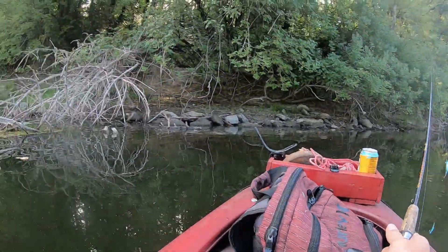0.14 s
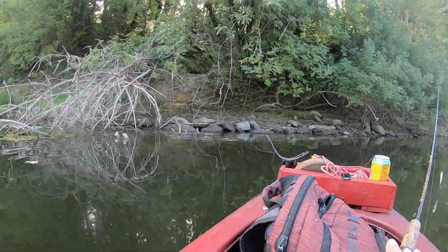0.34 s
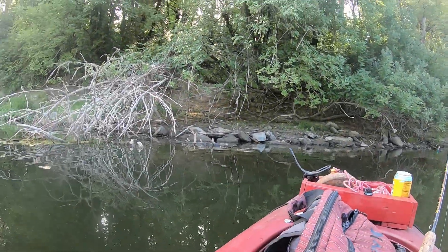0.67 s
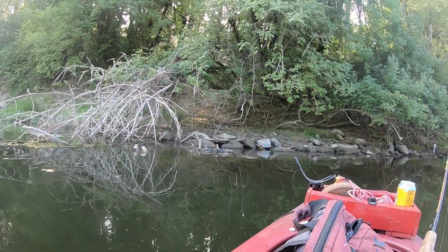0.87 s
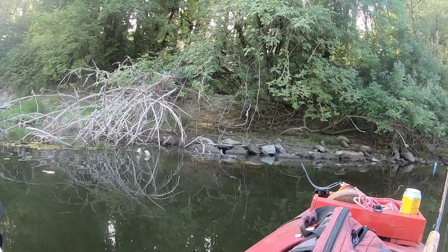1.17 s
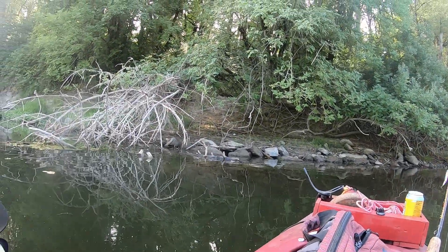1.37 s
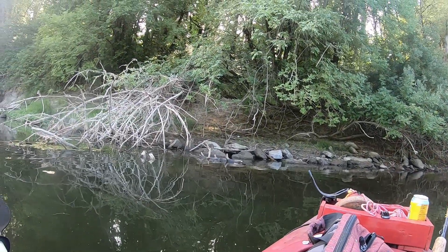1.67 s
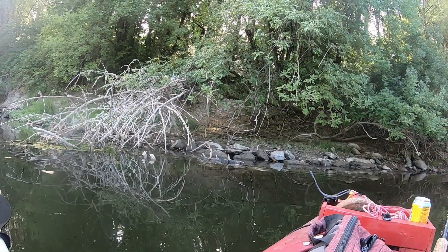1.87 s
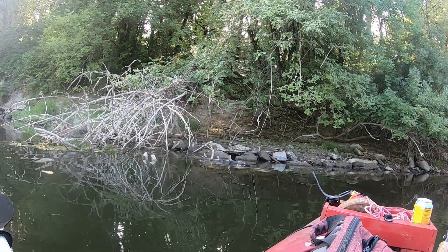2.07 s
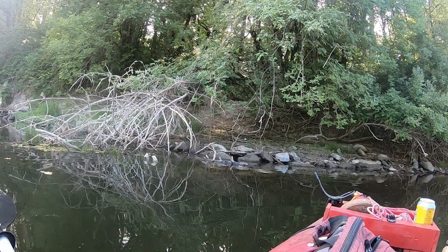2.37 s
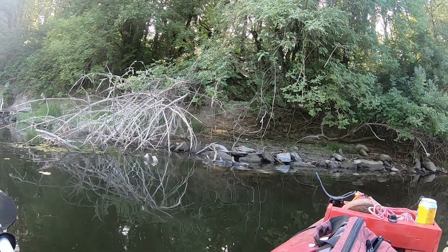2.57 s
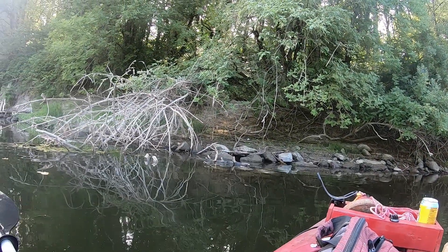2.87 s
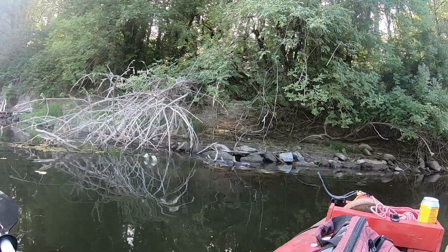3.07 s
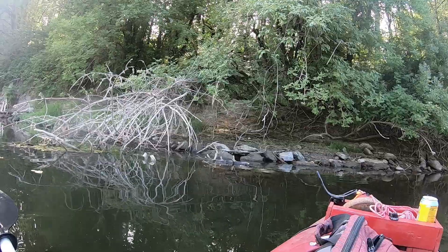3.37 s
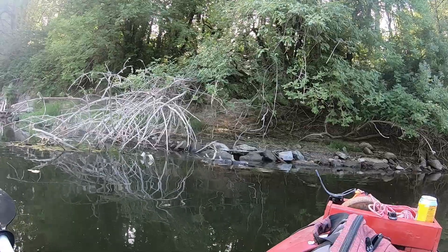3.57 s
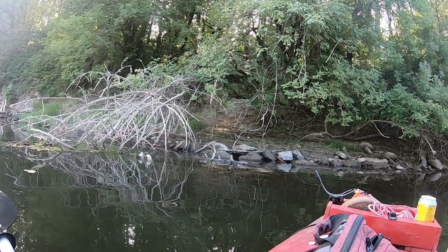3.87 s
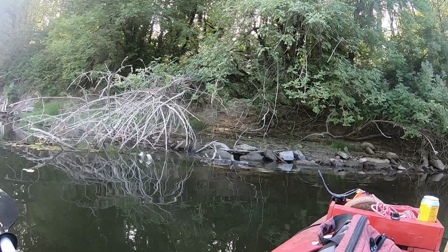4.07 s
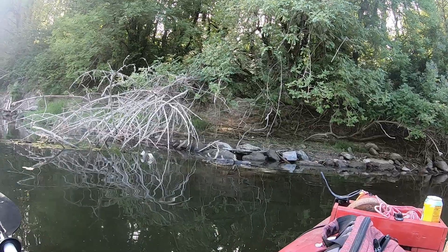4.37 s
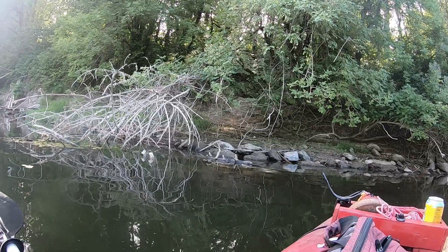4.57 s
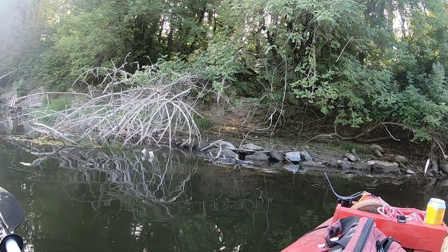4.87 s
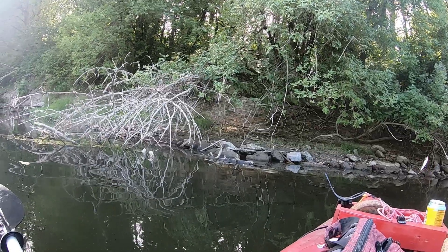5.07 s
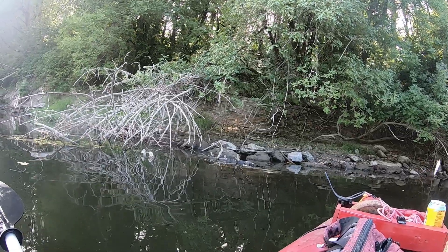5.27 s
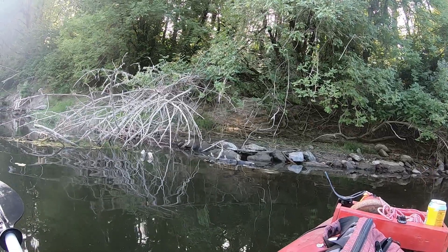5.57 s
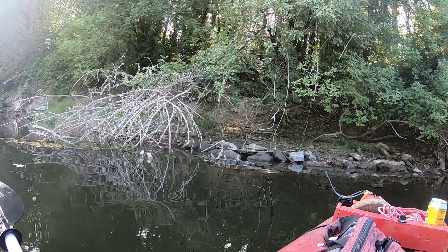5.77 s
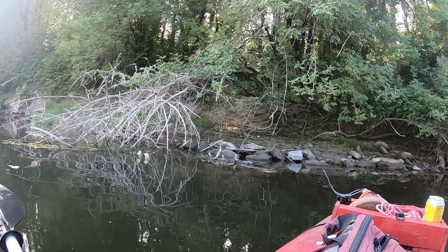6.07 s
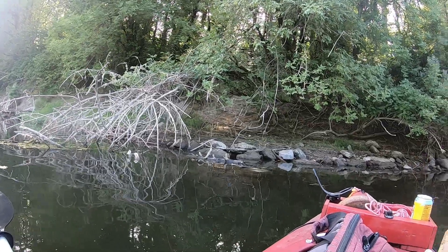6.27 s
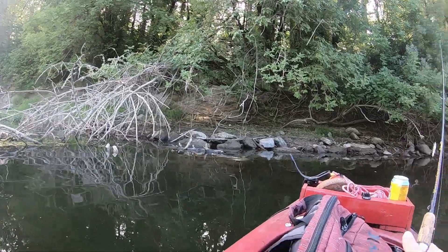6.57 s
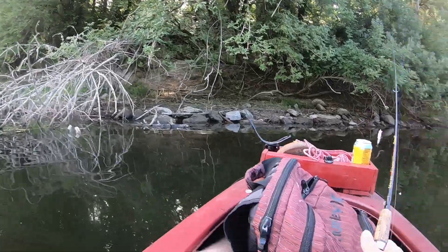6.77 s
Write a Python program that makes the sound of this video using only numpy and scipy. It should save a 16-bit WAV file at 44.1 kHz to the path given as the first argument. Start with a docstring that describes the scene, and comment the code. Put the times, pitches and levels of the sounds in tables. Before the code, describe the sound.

Fishing gear thumps and clacks against a hollow plastic kayak, with sleeve rustle, a brief bird whistle and soft riverside hush.

```python
"""A landing net and a fishing rod are handled in a plastic kayak: they thump the hollow hull,
clack against gear and scrape along the deck. Blows are ringing modes plus short bursts of shaped noise.
A sleeve rustles close to the microphone and the hull grumbles, both made of noise that swells and fades.
A bird on the wooded bank whistles once as a gliding, buzzing tone, over a soft outdoor hush of noise."""
import sys
import numpy as np
from scipy import signal
from scipy.fft import rfft, irfft, next_fast_len
from scipy.io import wavfile

SR = 44100
rng = np.random.default_rng(int(sys.argv[2]) if len(sys.argv) > 2 else 0)


def generate_wav(sig):
    """Save sig (samples, or channels by samples) to the path in sys.argv[1] as 16-bit PCM at SR."""
    pcm = np.round(np.clip(np.atleast_2d(sig).T, -1, 1) * 32767).astype(np.int16)
    wavfile.write(sys.argv[1], SR, pcm)


N = 305613
TIME = np.arange(N) / SR  # seconds
AGE = np.arange(int(0.6 * SR)) / SR  # seconds since a blow

# Levels are relative: the functions below still trim, vary or pan many of them.
# Steady outdoor hush: pitch_hz, level_db (per Hz)
HUSH_COLOUR = [(15, -31), (25, -4), (44, -3.5), (60, -17), (125, -15), (191, -6.5), (318, -19.5),
               (475, -19), (588, -22.5), (903, -12), (978, -11), (1910, -24.5), (2930, -38.5), (7890, -79),
               (15000, -76)]
HUSH_DB = -52.5
# Thin far chorus swelling in the trees: middle_s, length_s, level_db
CHORUS_SWELLS = [(2.96,0.24,-67.5),(3.5,0.36,-64.5),(4.56,0.46,-67.5)]
CHORUS_REST_DB = -86
# Bird whistle, arching and then falling away: time_s, pitch_hz
WHISTLE_GLIDE = [(5.50,3550),(5.55,4100),(5.66,4350),(5.90,4100),(6.0,3700),(6.11,3600)]
WHISTLE_DB, WHISTLE_ATTACK_S, WHISTLE_RELEASE_S = -61.5, 0.046, 0.046
WHISTLE_BUZZ = 0.042  # pitch jitter as a share of the pitch, at the top of the whistle

# Left-right likeness of diffuse sound: pitch_hz, correlation (-1 to 1)
STEREO_LIKENESS = [(60,0.68),(250,0.99),(630,0.5),(1400,0.0035),(3000,0.64),(6500,0),(14000,0)]

# Arm lowers the rod, rests and lifts it again; sleeve speed as a level: time_s, level_db
ARM_SPEED = [(0,-41),(.12,-46),(.42,-52.5),(.58,-60),(.82,-58),(1.5,-65.5),(1.8,-81),(5.8,-89),(6.2,-58.5),(6.54,-50),(6.93,-52)]
# Sleeve cloth: pitch_hz, level_db (per Hz)
SLEEVE_COLOUR = [(150,-12),(300,7.5),(600,8.5),(1000,3),(1700,4.5),(2500,2),(3500,-3),(5000,-10.5),(8000,-11),(12000,-41)]
# Fine fibres and threads: pitch_hz, level_db (per Hz)
FIBRE_COLOUR = [(2500,-17.5),(4500,-4.5),(6500,-2.5),(8500,0.5),(10000,-8.5),(12000,-24.5),(15000,-25)]
# Low rubbing, used for hull grumble and clothing thuds: pitch_hz, level_db (per Hz)
RUBBED_COLOUR = [(20,14),(43,0.5),(60,11),(80,11.5),(110,10.5),(150,1.5),(200,-3.5),(290,-3),(420,-15.5),(800,-58)]
# Net mesh brushing past: middle_s, length_s, level_db
MESH_BRUSHES = [(1.85,0.14,-78),(2.28,0.22,-75),(2.86,0.13,-74.5),(3.18,0.051,-72),(3.5,0.5,-74.5),(4.26,.22,-71)]
# Weight shifts in the seat, heard as hull grumbles: middle_s, length_s, level_db
WEIGHT_SHIFTS = [(1.44,.14,-42),(2.77,.08,-46),(3.5,.14,-39.5),(4.77,0.069,-48.5),(5.62,0.2,-53),(6.04,0.2,-40.5),(6.245,0.041,-26),(6.68,.1,-28)]
# Each layer's level against the arm's, then its level at rest
SLEEVE_DB, FIBRE_DB, GRUMBLE_DB = 2.5, -2, -13
SLEEVE_REST_DB, FIBRE_REST_DB, GRUMBLE_REST_DB = -67, -87, -59.5
GRUMBLE_FOLLOWS = 0.65  # share of the arm's swing in level (dB) that reaches the hull
# The boat settles with a low grumble after a blow: level against the boom, time to fall 60 dB
SETTLE_DB, SETTLE_T60_S = -13, 0.73
# Soft bumps of clothing by the microphone: time_s, thud_db
CLOTHING_BUMPS = [(0.454,-38.5),(0.580,-38),(0.649,-40),(0.750,-39.5),(0.780,-45),(0.83,-36),(0.913,-39.5)]
SWISH_DB = -17  # added to the bump's level

# Gear dragged over the deck: middle_s, length_s, level_db
DECK_DRAGS = [(.065,.04,-34),(3.49,0.063,-43.5),(6.04,0.23,-53),(6.145,0.051,-40),(6.24,0.053,-41.5),(6.4,0.029,-48),(6.58,0.058,-42.5)]
# Scraped plastic deck: pitch_hz, level_db (per Hz)
DECK_COLOUR = [(110,-1),(200,15),(330,-5.5),(450,9.5),(570,-1.5),(900,2),(1250,-8.5),(1800,-13),(2500,-12),(3100,-22),(3700,-18),(6000,-21),(12000,-56)]
# Light ticks of tackle: time_s, level_db, centre_hz
TACKLE_TICKS = [(1.052,-37.5,7560),(1.153,-50,7000),(1.197,-51,6550),(1.317,-50,4430),(1.329,-43.5,2780),(1.475,-44.5,7850),(2.429,-58,5940),(3.134,-52,7040),(3.173,-54,7600),(3.911,-45.5,7100),(4.245,-45,6700),(4.296,-57,6930),(4.313,-52,7400),(4.405,-42.5,6900),(4.840,-56,6960),(4.864,-50.5,7400),(5.235,-45,7440)]
# Net's metal handle clacking on gear: time_s, crack_db, tube_ring_db, knock_db
HANDLE_CLACKS = [(0.1956, -17.5, -39, -37), (0.2282, -11, -28, -35), (2.103, -27, -38, -49),
                 (2.8746, -39.5, -41, -44), (3.5043, -37.5, -49, -53), (4.0089, -21.5, -29.5, -55),
                 (4.6146, -23, -36.5, -38), (5.127, -23, -36.5, -36.5), (6.2735, -33.5, -29, -61),
                 (6.3757, -33, -30, -23)]
# Ringing modes of the handle: pitch_hz, level_db, fall_by_60_db_s
HANDLE_MODES = [(1230,-21,0.1),(1660,-13,0.14),(1950,-8,0.43),(2180,-4,0.28),(2490,2,0.22),(2570,3,0.14),(2960,-17,0.16),(3250,-12,.13),(3500,-8.5,0.19),(3630,2,0.23),(3770,-7,0.57),(4600,-12,0.18),(5430,-9,0.21),(6260,-6,.07),(6700,-10,.05)]
# Bright hard contact, also used for the clothing swish: pitch_hz, level_db (per Hz)
CLACK_COLOUR = [(900,-25),(1800,-2),(2500,4),(3600,1.5),(4600,-4),(6600,-7),(8500,-12),(10500,-26),(15000,-44)]

# Blows on the hull: time_s, shell_boom_db, panels_db, knock_db, crack_db
HULL_BLOWS = [(0.0519,-34.5,-29.5,-40.5,-46), (0.0783,-43,-41,-48,-41), (1.223,-37.5,-31,-32,-40.5),
              (1.366,-41,-33.5,-41.5,-48), (1.517,-35.5,-28,-36,-44), (1.6234,-45,-35,-66,-72),
              (1.943,-24,-24.5,-50,-39.5), (2.0773,-31,-35,-31,-34.5), (2.2047,-38.5,-39,-47.5,-54),
              (2.2502,-31,-26.5,-51,-43.5), (2.3065,-36.5,-39.5,-36,-42.5), (2.6518,-29.5,-27.5,-44.5,-49),
              (2.8492,-29.5,-33,-36,-42.5), (2.9305,-31,-27,-45.5,-43), (3.9844,-28,-25.5,-24.5,-31),
              (4.129,-30,-31,-27,-26.5), (4.596,-29,-34,-32.5,-36), (4.9458,-28,-22.5,-49,-44),
              (5.107,-23,-31.5,-33.5,-40), (5.22,-31,-28,-56,-45), (5.8783,-37.5,-40.5,-63,-57),
              (5.9645,-35.5,-31.5,-28,-28), (6.043,-41,-53,-44,-48), (6.065,-44,-38.5,-37,-38.5),
              (6.162,-31.5,-31,-45,-56), (6.2242,-24.5,-47,-36.5,-35.5), (6.354,-32,-27.5,-32.5,-30.5),
              (6.3764,-27,-23.5,-28,-27), (6.611,-14,-15.5,-21,-25), (6.6254,-18.5,-26.5,-28.5,-21),
              (6.6454,-21,-27,-34.5,-23.5), (6.682,-29,-23,-34,-41), (6.8595,-51,-33.5,-46,-50)]
# Hull modes from whole shell up to single panels: pitch_hz, level_db, fall_by_60_db_s
HULL_MODES = [(44,-5.5,0.56),(55,-11,0.3),(71.3,-7.5,0.61),(86.3,-1.5,0.3),(102.2,0,0.38),(122.1,-2.5,0.25),(146.4,3.5,0.26),(171.7,1,0.2),(197.8,5,0.25),(231.4,-2.5,0.27),(251.8,-5,0.25),(281.4,-8.5,0.28),(301.5,-4,0.21),(324,-16,0.12),(368.2,-7,0.19),(399.7,-2.5,0.24),(434,-4.5,0.2),(473.2,-2.5,0.14),(497.3,-3.5,0.21),(545,-9,0.16),(638.6,-7,0.2)]
# Short ring of the struck wooden part: pitch_hz, level_db, fall_by_60_db_s
WOOD_MODES = [(830,-2.5,0.072),(964,-1,0.066),(1088,0,0.064),(1218,-7.5,0.096),(1384,-5.5,0.05),(1570,-10,0.033),(2417,-4,0.035)]
# Dull knock of a contact: pitch_hz, level_db (per Hz)
KNOCK_COLOUR = [(300,-18),(480,-10.5),(570,-2.5),(660,6.5),(780,6),(1000,3),(1250,-7.5),(1600,-13.5),(2100,-12.5),(3200,-54.5)]
# Brighter crack of a contact: pitch_hz, level_db (per Hz)
CRACK_COLOUR = [(900,-17),(1700,2),(2500,4),(3100,-3.5),(3700,-1.5),(4600,-7),(7000,-47)]
# Sharp high snap of a contact: pitch_hz, level_db (per Hz)
SNAP_COLOUR = [(3000,-18),(4700,5.5),(6800,1.5),(8500,-2),(10000,-14),(11500,-34),(15000,-49)]
WOOD_DB, SNAP_DB = -12.5, -19.5  # added to the knock's and the crack's level
# Stiff panels follow the wide ones and, by a share, the hardness of the knock
STIFF_DB, STIFF_FOLLOWS_KNOCK = -11.5, 0.37
# A heavier blow squeezes the contact harder: extra dB in the stiff panels per dB of boom
STIFFENING, USUAL_BOOM_DB = 0.25, -31


def from_db(db):
    """Turn decibels into gain."""
    return 10 ** (np.asarray(db) / 20)


def rms_one(x):
    """Scale to unit power."""
    return x / np.sqrt(np.mean(x ** 2) + 1e-20)


def unit_onset(x):
    """Scale a blow to unit power over its first 30 ms."""
    onset = x[..., :int(0.03 * SR)]
    return x / np.sqrt(np.mean(onset ** 2) + 1e-20)


def in_time(rows):
    """Read the columns of a time curve at every sample."""
    s, *columns = np.transpose(rows)
    return [np.interp(TIME, s, column) for column in columns]


def at_hz(points, hz):
    """Read a curve over pitch, spaced as the ear hears it (log frequency)."""
    point_hz, value = np.transpose(points)
    return np.interp(np.log(hz + 1), np.log(point_hz), value)


def drift(rate, size=N):
    """Wander randomly with unit power; rate is random points per second."""
    knots = rng.standard_normal(int(size / SR * rate) + 2)
    return rms_one(np.interp(np.arange(size) / SR * rate, np.arange(len(knots)), knots))


def noise(colour, size=N, alike=None, ripple_db=0):
    """Coloured stereo noise of unit power, diffuse by default; ripple adds chance resonances."""
    padded = next_fast_len(size)
    hz = np.arange(padded // 2 + 1) * SR / padded
    ripple = ripple_db * np.interp(hz, np.linspace(0, SR / 2, 160), rng.standard_normal(160))
    white = rfft(rng.standard_normal((2, padded)))
    mid, side = white * from_db(at_hz(colour, hz) + ripple)
    likeness = at_hz(STEREO_LIKENESS, hz) if alike is None else alike
    likeness = np.clip(likeness, -1, 1)
    # the side part has opposite signs left and right
    stereo = np.sqrt(1 + likeness) * mid + np.sqrt(1 - likeness) * side * [[1], [-1]]
    return rms_one(irfft(stereo, padded)[:, :size])


def pan(left_db):
    """Gains of two channels whose levels differ by left_db."""
    return from_db(np.array([[left_db], [-left_db]]) / 2)


def dying(t60):
    """Fade steadily in decibels, losing 60 dB in t60 seconds."""
    return from_db(-60 * AGE / np.maximum(t60, 0.002))


def swells(rows):
    """Gain of smooth bell-shaped gestures, each with a middle, length and level."""
    return sum(from_db(db) * np.exp(-2 * ((TIME - s) / length) ** 2) for s, length, db in rows)


def add(out, s, sound):
    """Mix a short sound in at a time in seconds."""
    start = max(round(s * SR), 0)
    out[:, start:start + len(AGE)] += sound[:, :N - start]


def ring(modes, spread_db, rise_s, detune, side_db):
    """Sum fading sine waves whose strength, sign and pitch vary as the struck spot would."""
    hz, db, t60 = np.transpose(modes)[:, :, None]
    hz = hz * (1 + detune * rng.standard_normal(hz.shape))
    strength = from_db(db + spread_db * rng.standard_normal(hz.shape))
    strength = strength * rng.choice([-1, 1], hz.shape)
    # the hand or the water takes much of the swing at once; the rest rings on
    fade = dying(t60) + from_db(-0.5) * dying(0.31 * t60)
    swing = strength * fade * (1 - np.exp(-AGE / rise_s))
    phase = 2 * np.pi * hz * AGE
    mid = np.sum(swing * np.sin(phase), axis=0)
    # each mode arrives from its own direction
    side = np.sum(swing * np.cos(phase) * rng.choice([-1, 1], hz.shape), axis=0)
    return unit_onset(mid) + from_db(side_db) * unit_onset(side) * [[1], [-1]]


def contact(colour, t60, rise_s, chatter_db, tail_db, tail_s, alike):
    """Surfaces chatter for a moment as a noise burst, then a weak tail dies away."""
    chatter = from_db(chatter_db * drift(1144, size=len(AGE)))
    fade = dying(t60) * chatter + from_db(tail_db) * dying(tail_s)
    envelope = fade * (1 - np.exp(-AGE / rise_s))
    return unit_onset(noise(colour, size=len(AGE), alike=alike, ripple_db=6.0) * envelope)


def riverside():
    """Steady hush, a far chorus made of noise and one very faint high tone."""
    hush = from_db(HUSH_DB + 0.5 * drift(8.1)) * noise(HUSH_COLOUR)
    chorus_colour = [(2800, -7.5), (3900, -9), (4500, -5.5), (5600, -25.0), (8000, -49)]
    chorus = (swells(CHORUS_SWELLS) + from_db(CHORUS_REST_DB)) * noise(chorus_colour)
    tone = from_db(-89 + 2 * drift(8)) * np.sin(2 * np.pi * 6140 * TIME)
    return hush + chorus + tone


def bird():
    """A thin whistle with jittering pitch, smeared by echoes from the trees."""
    hz, = in_time(WHISTLE_GLIDE)
    attack = (TIME - WHISTLE_GLIDE[0][0]) / WHISTLE_ATTACK_S
    release = (WHISTLE_GLIDE[-1][0] - TIME) / WHISTLE_RELEASE_S
    singing = np.clip(np.minimum(attack, release), 0, 1)
    # the buzz clears as the note falls away
    buzz = WHISTLE_BUZZ * (hz / hz.max()) ** 4
    phase = 2 * np.pi * np.cumsum(hz * (1 + buzz * drift(700))) / SR
    call = from_db(WHISTLE_DB) * singing * np.sin(phase)
    echoes = rng.standard_normal((2, len(AGE))) * dying(0.3)
    echoes /= np.sqrt(np.sum(echoes ** 2, axis=1, keepdims=True))
    echoed = signal.fftconvolve(call[None], echoes, axes=1)[:, :N]
    return (0.68 * call + 0.77 * echoed) * pan(-5.0)


def clothing_bumps():
    """Each shift of the arm gives a muffled thud and a short swish."""
    out = np.zeros((2, N))
    for s, db in CLOTHING_BUMPS:
        thud = contact(RUBBED_COLOUR, t60=0.13, rise_s=0.0072, chatter_db=0.5,
                       tail_db=-25, tail_s=0.22, alike=0.3)
        swish = contact(CLACK_COLOUR, t60=0.051, rise_s=0.0028, chatter_db=4,
                        tail_db=-29, tail_s=0.15, alike=0.1)
        add(out, s, from_db(db - 5.5) * thud * pan(-15.5) + from_db(db + SWISH_DB) * swish)
    return out


def sleeve_rustle(sliding, catching):
    """Cloth rubs in uneven grains near the microphone."""
    level = np.hypot(from_db(SLEEVE_DB) * sliding, from_db(SLEEVE_REST_DB))
    return level * from_db(2.94 * catching) * noise(SLEEVE_COLOUR)


def fibre_crackle(sliding, catching):
    """Fine fibres hiss while single threads snag and let go."""
    fibre_db = 20 * np.log10(from_db(FIBRE_DB) * sliding + swells(MESH_BRUSHES) + from_db(FIBRE_REST_DB))
    # about 55 snags per second
    snags = (rng.random(N) < 55 / SR) * from_db(3.2 * rng.standard_normal(N))
    crackle = rms_one(signal.fftconvolve(snags, dying(0.006))[:N])
    # snags stand out most when the sliding is slow
    crackle = crackle * from_db(-5 - 0.19 * (fibre_db + 71))
    grain = from_db(2 * drift(470)) + crackle
    return from_db(fibre_db - 0.5 + 2.0 * catching) * grain * noise(FIBRE_COLOUR)


def settling():
    """Gain of the grumble that builds after each blow and dies away."""
    power = np.zeros((1, N))
    for s, boom_db, *_ in HULL_BLOWS:
        gain = from_db(boom_db + SETTLE_DB) * dying(SETTLE_T60_S) * (1 - dying(0.11))
        add(power, s, gain[None] ** 2)
    return np.sqrt(power[0])


def hull_grumble(sliding):
    """Arm movement, shifting weight and settling make the hull grumble."""
    load = from_db(GRUMBLE_DB) * sliding ** GRUMBLE_FOLLOWS + swells(WEIGHT_SHIFTS)
    load = load + settling() + from_db(GRUMBLE_REST_DB)
    return load * from_db(3.96 * drift(22)) * noise(RUBBED_COLOUR, alike=0.87) * pan(-1.8)


def handling():
    """The arm's speed drives the sleeve, the fibres and the grumble together."""
    arm_db, = in_time(ARM_SPEED)
    catching = drift(45)
    # below a light touch the cloth stops sliding, leaving the resting levels
    sliding = from_db(arm_db) / (1 + from_db(1.9 * (-64.5 - arm_db)))
    return sleeve_rustle(sliding, catching) + fibre_crackle(sliding, catching) + hull_grumble(sliding)


def deck_scrape():
    """Uneven slips of gear on the plastic, each dying away over some tens of milliseconds."""
    # about 170 slips per second
    slips = (rng.random(N) < 170 / SR) * from_db(1.4 * rng.standard_normal(N))
    grip = rms_one(signal.fftconvolve(slips, dying(0.088))[:N])
    return swells(DECK_DRAGS) * grip * noise(DECK_COLOUR, alike=0.55, ripple_db=3.5) * pan(2.1)


def tackle_ticks():
    """Tiny hard parts touch, each with one broad resonance."""
    out = np.zeros((2, N))
    for s, db, hz in TACKLE_TICKS:
        colour = [(hz / 4, -16), (hz, 0), (hz * 1.29, -3), (hz * 1.34, -28)]
        tick = contact(colour, t60=0.015, rise_s=0.00045, chatter_db=8,
                       tail_db=-12, tail_s=0.1, alike=0.11)
        add(out, s, from_db(db - 14) * tick)
    return out


def handle_clacks():
    """A hard contact sets the metal tube ringing briefly."""
    out = np.zeros((2, N))
    for s, crack_db, ring_db, knock_db in HANDLE_CLACKS:
        tube = ring(HANDLE_MODES, spread_db=6.5, rise_s=0.00034, detune=0.0017, side_db=-4.5)
        crack = contact(CLACK_COLOUR, t60=0.029, rise_s=0.001, chatter_db=1.5,
                        tail_db=-26.5, tail_s=0.36, alike=-0.098)
        knock = contact(KNOCK_COLOUR, t60=0.037, rise_s=0.00024, chatter_db=2.5,
                        tail_db=-28, tail_s=0.17, alike=0.56)
        metal = from_db(crack_db - 19.5) * crack + from_db(ring_db - 19.0) * tube
        add(out, s, metal * pan(6.9) + from_db(knock_db - 9.5) * knock)
    return out


def hull_blows():
    """The contact cracks and knocks first; the panels and then the whole shell build up."""
    out = np.zeros((2, N))
    # the lowest modes move the whole shell, the higher ones single panels
    shell, wide, stiff = HULL_MODES[:6], HULL_MODES[6:12], HULL_MODES[12:]
    for s, boom_db, panel_db, knock_db, crack_db in HULL_BLOWS:
        stiff_db = panel_db + STIFF_FOLLOWS_KNOCK * (knock_db - panel_db)
        stiff_db += STIFFENING * (boom_db - USUAL_BOOM_DB) + STIFF_DB
        boom = ring(shell, spread_db=3, rise_s=0.0078, detune=0.027, side_db=-24.5)
        wide_ring = ring(wide, spread_db=5, rise_s=0.0039, detune=0.022, side_db=-24.5)
        stiff_ring = ring(stiff, spread_db=3.0, rise_s=0.0055, detune=0.016, side_db=-9.5)
        wood = ring(WOOD_MODES, spread_db=3.0, rise_s=0.00039, detune=0.023, side_db=-6)
        knock = contact(KNOCK_COLOUR, t60=0.042, rise_s=0.0013, chatter_db=1.0,
                        tail_db=-20, tail_s=0.33, alike=0.64)
        crack = contact(CRACK_COLOUR, t60=0.051, rise_s=0.001, chatter_db=1.5,
                        tail_db=-18.0, tail_s=0.3, alike=0.68)
        snap = contact(SNAP_COLOUR, t60=0.052, rise_s=0.001, chatter_db=4.0,
                       tail_db=-16, tail_s=0.22, alike=-0.58)
        blow = from_db(boom_db) * boom * pan(-0.36)
        blow += from_db(panel_db - 3.0) * wide_ring * pan(-0.7)
        blow += from_db(stiff_db) * stiff_ring * pan(-2.0)
        blow += from_db(knock_db + WOOD_DB) * wood * pan(5)
        blow += from_db(knock_db - 10.5) * knock * pan(7.0)
        blow += from_db(crack_db - 17.0) * crack * pan(11.4)
        blow += from_db(crack_db + SNAP_DB) * snap * pan(5.3)
        add(out, s, blow)
    return out


def scene():
    """Everything heard from the seat of the kayak."""
    gear = hull_blows() + handle_clacks() + tackle_ticks() + deck_scrape()
    # the gear lies to the left, so it reaches the right port one sample later
    gear = np.array([gear[0], np.roll(gear[1], 1)])
    return riverside() + bird() + clothing_bumps() + handling() + gear


def record(dry):
    """The microphone drops the deepest bass and the very top is cut."""
    bass_cut = signal.butter(2, 22, "high", fs=SR, output="sos")
    # 70 dB down from 15.7 kHz upward
    top_cut = signal.cheby2(14, 70, 15700, fs=SR, output="sos")
    return signal.sosfilt(top_cut, signal.sosfilt(bass_cut, dry))


dry = scene()
out = record(dry)
generate_wav(out)
```